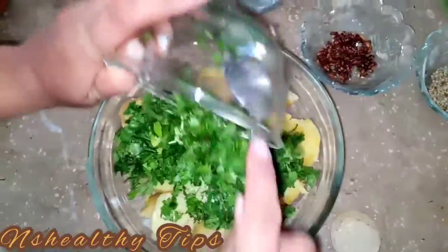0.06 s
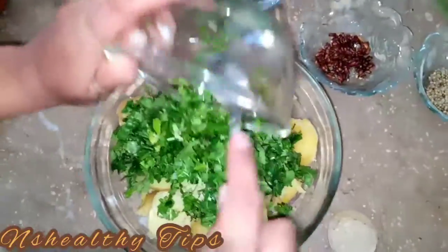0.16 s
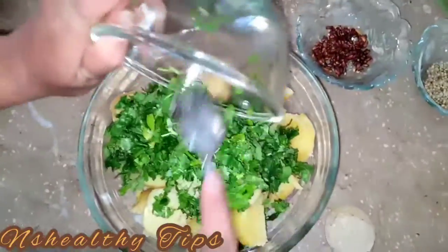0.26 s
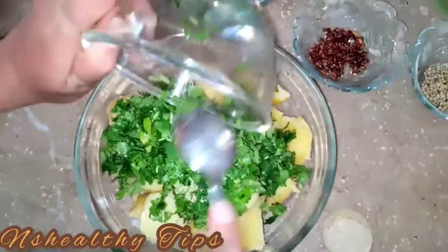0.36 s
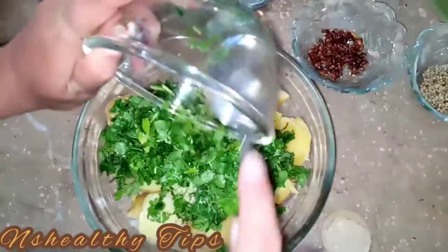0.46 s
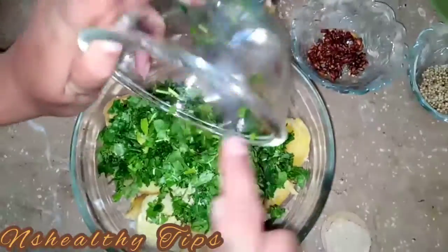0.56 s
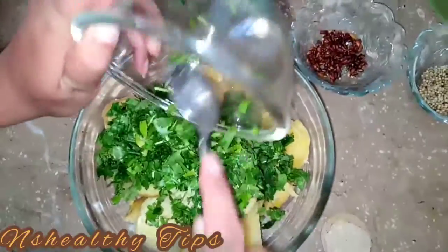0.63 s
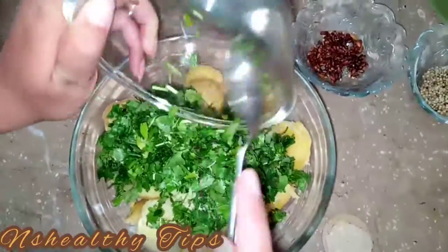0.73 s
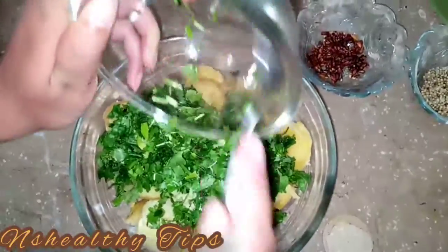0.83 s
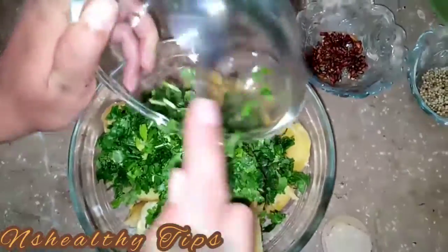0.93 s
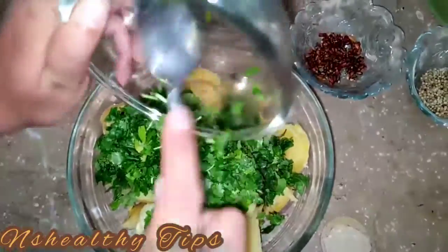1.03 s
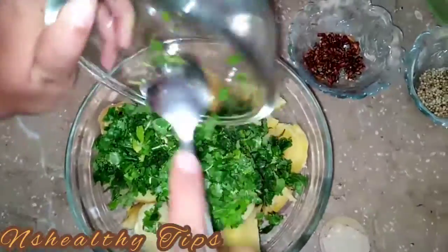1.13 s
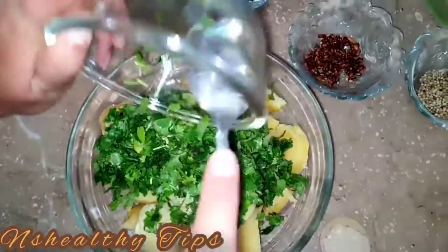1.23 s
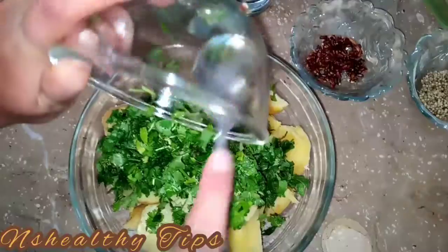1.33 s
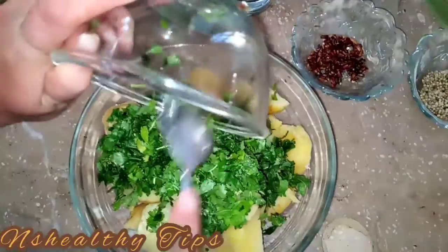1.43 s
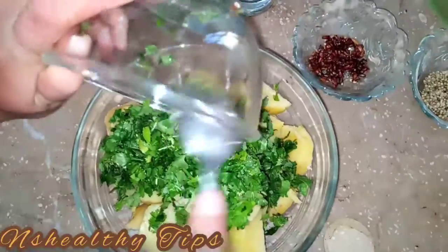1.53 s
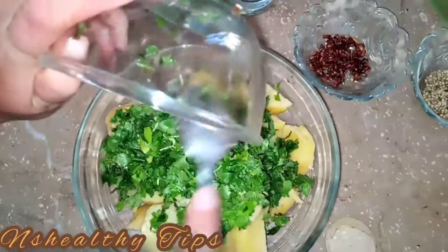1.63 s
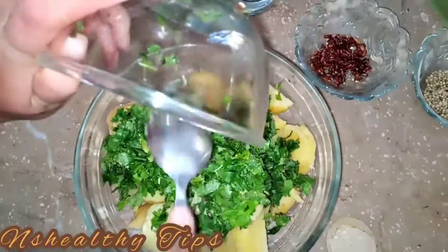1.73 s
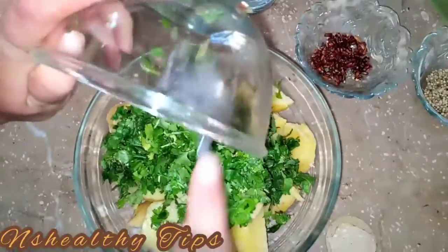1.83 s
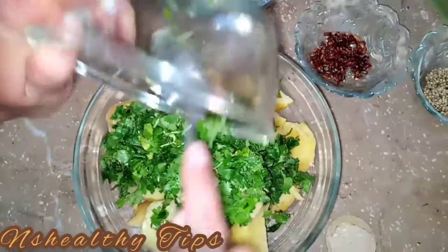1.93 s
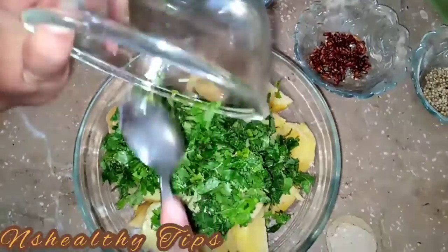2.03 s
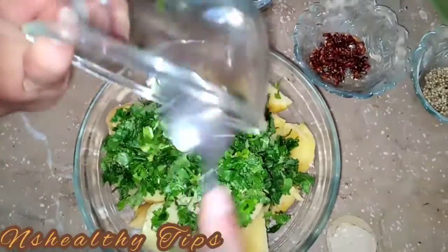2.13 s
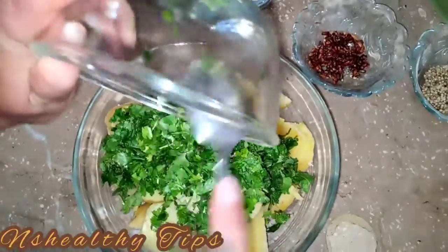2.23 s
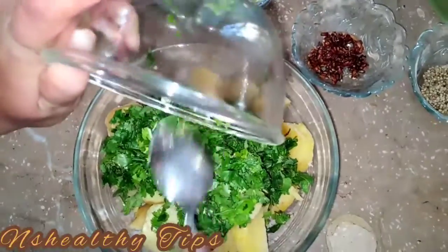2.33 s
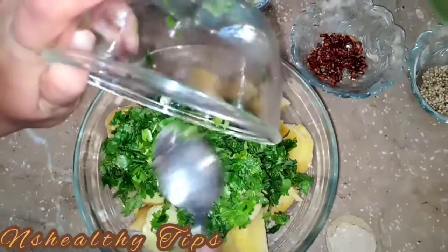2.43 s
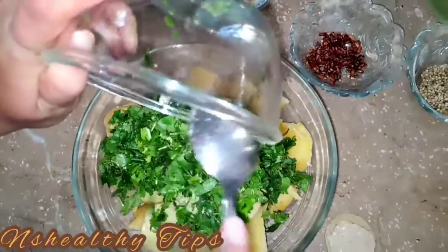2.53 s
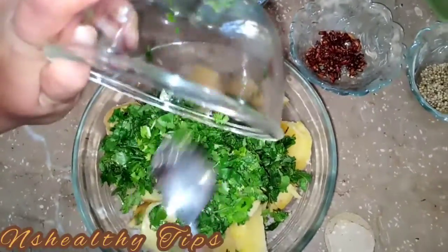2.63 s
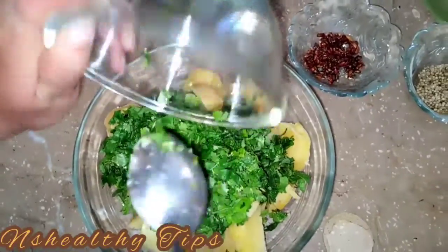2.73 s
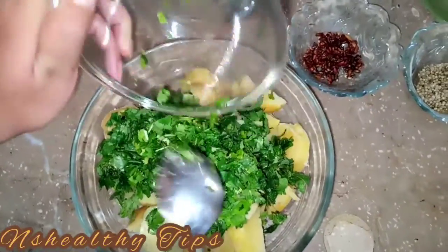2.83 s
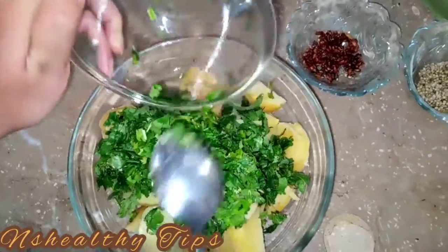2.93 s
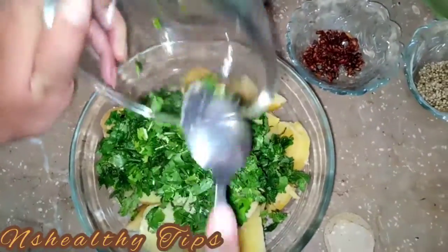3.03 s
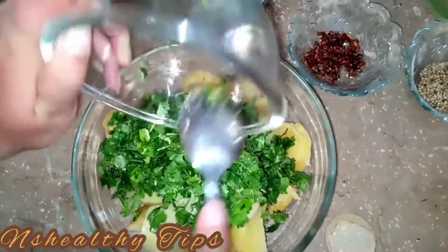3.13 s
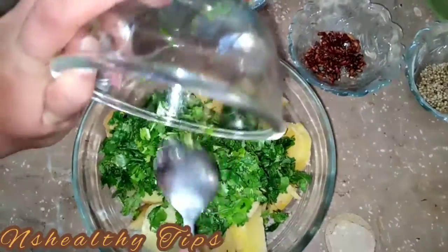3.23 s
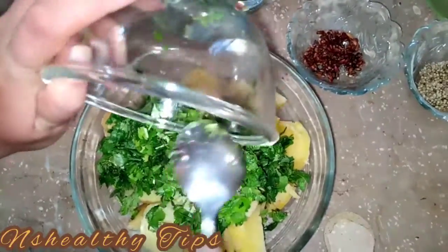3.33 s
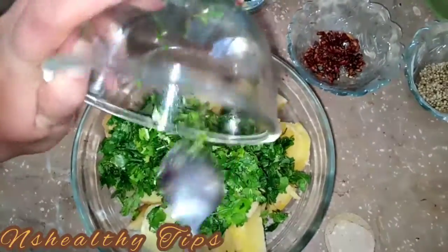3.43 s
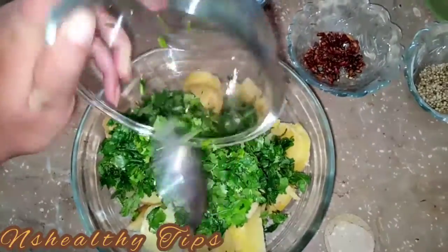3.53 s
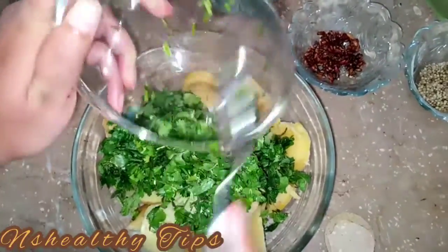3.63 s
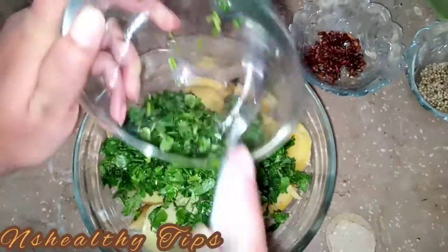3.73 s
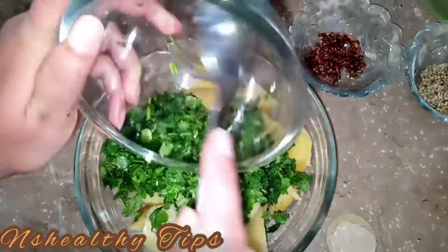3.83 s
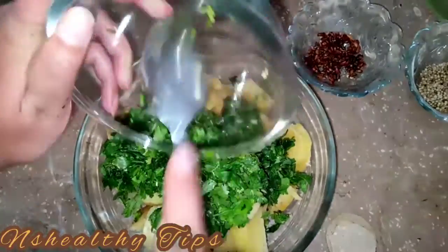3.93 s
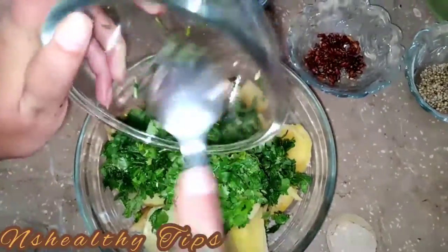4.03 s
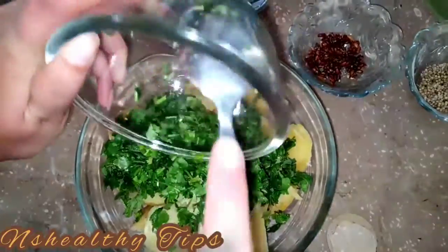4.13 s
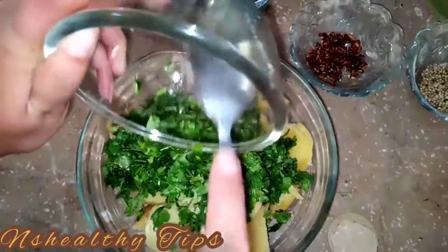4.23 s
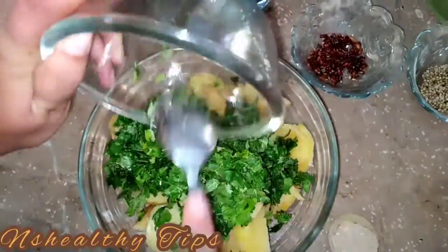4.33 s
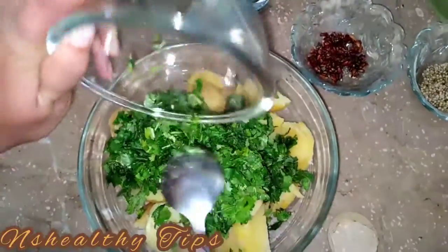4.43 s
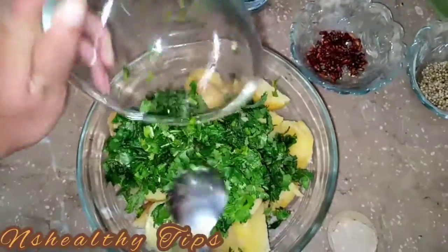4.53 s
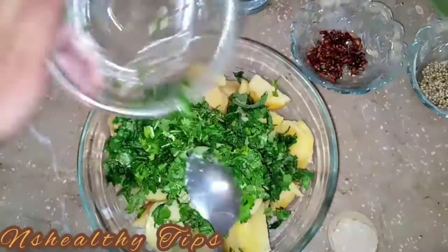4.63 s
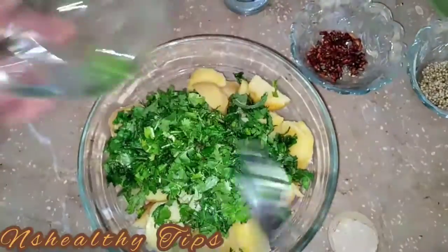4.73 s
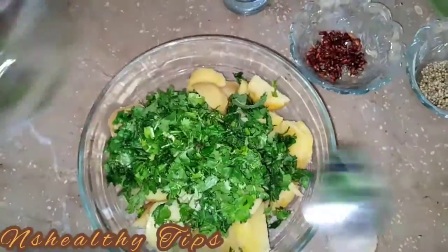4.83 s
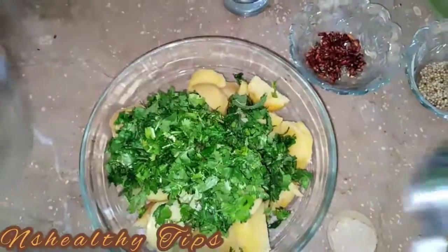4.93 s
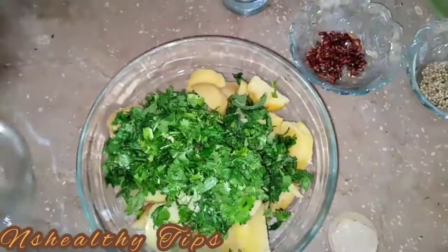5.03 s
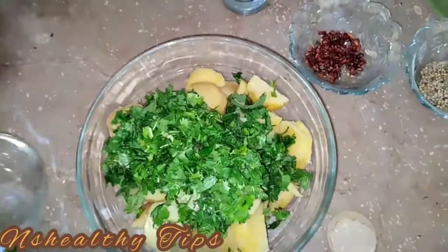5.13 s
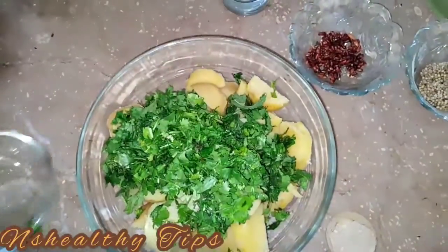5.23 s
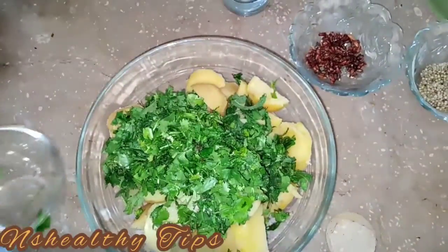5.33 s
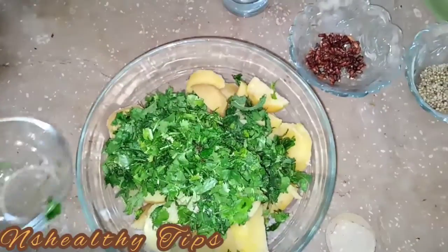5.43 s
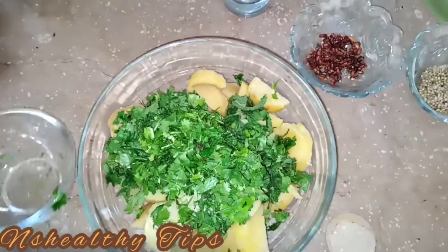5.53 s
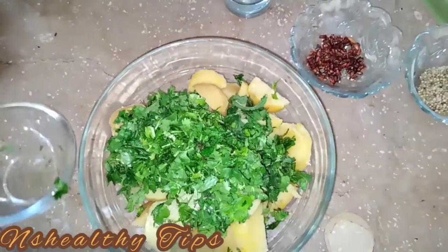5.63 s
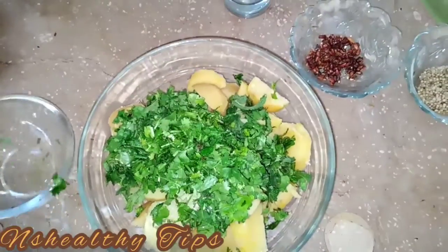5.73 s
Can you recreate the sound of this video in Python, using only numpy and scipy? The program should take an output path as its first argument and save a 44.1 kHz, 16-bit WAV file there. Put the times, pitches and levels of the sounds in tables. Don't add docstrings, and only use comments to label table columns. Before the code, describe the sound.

A close, nearly mono kitchen sound with a steady airy hiss, very faint far traffic and a short, bright room tail. A steel spoon strikes a hand-held glass bowl: a crisp clink at 0.05 s, two more near 0.45 s, a tap with a scrape at 0.75 s, and the strongest clear tap at 1.2 s. A short squeak follows at 1.37 s, a raspy tap at 1.55 s and a duller edge knock at 1.86 s. Chattering clusters come at 2.2-2.6 s and 3.1-3.4 s, with gritty rasps between glassy rings, all choked quickly by the grip. From 3.9 to 4.3 s, edge knocks ring the spoon's handle thinly, the last brightest, trailing into a faint scrape. Hiss alone follows, with a barely audible hand brush at 5.2 s. At 5.6 s the bowl's foot clacks hard on stone, rocks back at 5.67 s and settles over a low, soft counter boom.

```python
import sys
import numpy as np
from scipy import signal
from scipy.fft import rfft, irfft, next_fast_len
from scipy.io import wavfile
from scipy.ndimage import uniform_filter1d, minimum_filter1d, map_coordinates

SR = 44100
rng = np.random.default_rng(int(sys.argv[2]) if len(sys.argv) > 2 else 0)


def unload_wav(signal):
    wavfile.write(
        sys.argv[1],
        SR,
        np.round(np.clip(np.atleast_2d(signal).T, -1, 1) * 32767).astype(np.int16),
    )


def decibels_to_gain(level_db):
    exponent = np.asarray(level_db, float) / 20
    return 10 ** exponent


N = 254671


def unit(x):
    return x / np.sqrt(np.mean(x ** 2) + 1e-20)


def along(points, hz):
    f, v = np.transpose(points)
    return np.interp(np.log(hz + 1), np.log(f + 1), v)


def coloured(x, spectrum):
    m = next_fast_len(len(x) + 8192)
    hz = np.fft.rfftfreq(m, 1 / SR)
    response = decibels_to_gain(along([(1, -120)] + spectrum + [(SR / 2, -120)], hz))
    return irfft(rfft(x, m) * response, m)[:len(x)]


def add(track, s, sound):
    track[round(s * SR):][:len(sound)] += sound


def wobble(rate):
    return map_coordinates(rng.standard_normal(int(N * rate / SR) + 4), [np.arange(N) * rate / SR])


def curve(rows):
    return np.interp(np.arange(N) / SR, *np.transpose(rows))


LIFE = np.arange(SR // 5) / SR


def ring(modes, db, scatter_db=0.0, beat_depth=0.19, damping=1):
    hz, level, t60 = np.transpose(modes)[..., None]
    luck = rng.standard_normal((4, len(modes), 1))
    attack = 1 - np.exp(-LIFE / 0.00041)
    decay = decibels_to_gain(db + level + scatter_db * luck[0] - 60 * LIFE / np.abs(t60 * damping)) * attack
    choke = .5 + 0.27 * np.exp(-(LIFE / 0.019) ** 2)
    beat = 1 + beat_depth * np.cos(2 * np.pi * 0.015 * hz * luck[2] * LIFE + 3 * luck[3])
    flutter_depth = 1.2 * beat_depth * np.clip(hz / 4000, 0, 1) * (1 - np.exp(-LIFE / .008))
    flutter = 1 + flutter_depth * np.cos(2 * np.pi * 85 * (1 + .3 * luck[0]) * LIFE + 3 * luck[1])
    tone = np.sign(luck[2]) * np.sin(2 * np.pi * hz * (1 + 0.0045 * luck[1]) * LIFE)
    return np.sum(decay * choke * beat * flutter * tone, axis=0)


def burst(spectrum, db, t60):
    noise = unit(coloured(rng.standard_normal(len(LIFE)), spectrum))
    return noise * decibels_to_gain(db - 60 * LIFE / t60) * (1 - np.exp(-LIFE / 0.00045))


def patchy(spectrum, size, patchy_db, streak_db):
    z = signal.stft(rng.standard_normal(N), nperseg=size)[2]
    patches = uniform_filter1d(rng.standard_normal(z.shape), size=12, axis=0)
    patches = uniform_filter1d(patches, size=5, axis=1)
    streaks = uniform_filter1d(rng.standard_normal(z.shape), size=3, axis=1)
    gain = decibels_to_gain(patchy_db * unit(patches) + streak_db * np.clip(unit(streaks), -3, 1.5))
    return unit(coloured(signal.istft(z * gain, nperseg=size)[1][:N], spectrum))


# t/s, level/dB
TRAFFIC_LEVEL = [(0.0, -77), (0.29, -89), (0.5, -76), (1.13, -86.5), (1.33, -77), (1.41, -85), (2.0, -78),
                 (2.13, -85.5), (2.84, -78.5), (3.01, -77.5), (3.19, -79), (3.51, -89), (3.95, -81.5),
                 (4.94, -84), (5.36, -77), (5.58, -71)]
AIR_LEVEL = [(0.0, -48), (0.08, -48.5), (1.29, -48), (1.44, -47.5), (2.28, -48.5), (2.41, -47.5),
             (2.89, -50), (3.31, -48), (3.47, -48.5), (4.74, -50), (5.66, -46.5), (5.77, -47)]
# f/Hz, level/dB per Hz
RUMBLE_SPECTRUM = [(25, -39), (60, -2.5), (120, 7), (190, -0.5), (260, -35)]
DRONE_SPECTRUM = [(140, -14.5), (220, -4), (330, 0.5), (450, -6), (600, -2), (780, -4), (950, -36)]
MURK_SPECTRUM = [(700, -20), (850, 3), (1300, 7.5), (2500, 3.5), (4000, 6.5), (5000, 11.5)]
HISS_SPECTRUM = [(4000, -19), (5500, -2.5), (6700, -2), (7600, -9), (13800, -22), (14600, -8),
                 (15600, -1.5), (15800, -40)]


def floor():
    traffic_db, air_db = curve(TRAFFIC_LEVEL), curve(AIR_LEVEL)
    rumble = decibels_to_gain(traffic_db + 0.5) * patchy(RUMBLE_SPECTRUM, size=1024, patchy_db=2.5, streak_db=3.5)
    drone_db = -69 + 0.49 * (traffic_db - traffic_db.mean()) + 0.92 * wobble(4.0)
    drone = decibels_to_gain(drone_db) * patchy(DRONE_SPECTRUM, size=2048, patchy_db=2.0, streak_db=8.0)
    murk_db = -51.5 + 0.63 * (air_db - air_db.mean()) + 0.5 * wobble(4.6)
    murk = decibels_to_gain(murk_db) * patchy(MURK_SPECTRUM, size=2048, patchy_db=2.0, streak_db=4.5)
    hiss = decibels_to_gain(air_db + 1.0) * patchy(HISS_SPECTRUM, size=2048, patchy_db=2.0, streak_db=4.5)
    return rumble + drone + murk + hiss


# f/Hz, t60/s
KITCHEN_T60 = [(300, .25), (1200, .21), (3000, .19), (8000, .14), (16000, .08)]


def kitchen(x):
    out = np.zeros(N + SR)
    for start in range(0, N, SR // 2):
        hz, t, z = signal.stft(rng.standard_normal(SR // 3), SR, nperseg=256)
        decay = decibels_to_gain(-60 * t / along(KITCHEN_T60, hz)[:, None])
        tail = signal.istft(z * decay, SR, nperseg=256)[1]
        echo = signal.fftconvolve(x[start:start + SR // 2], tail / np.linalg.norm(tail))
        add(out, start / SR + .004, echo)
    return out[:N]


# f/Hz, level/dB, t60/s
BOWL_MODES = [
    [(1174.6, -2, 0.31), (1215, 1.5, 0.1), (1140, -21, 0.016)],
    [(2893, -8.5, 0.17), (2964, 2.5, 0.035), (2986, -11, 0.1), (3320, -50, 0.035)],
    [(5280, -3.5, 0.079), (5283, 2.5, 0.067), (5515, -7.5, 0.069), (4900, -25, 0.038), (5330, -24, 0.05),
     (5750, 0, 0.017)],
]
# t/s, clack level/dB, boom level/dB
LANDINGS = [
    (5.609, -19.5, -49),
    (5.631, -53, -49),
    (5.671, -26, -53),
    (5.692, -39, -49.5),
    (5.703, -39, -48.5),
    (5.226, -50, -56.5),
    (5.205, -50, -63),
]
# f/Hz, level/dB, t60/s
COUNTER_MODES = [(96.7, -3, 0.94), (310, 8, 0.032), (544, 0, 0.043)]
# f/Hz, level/dB per Hz
CLACK_SPECTRUM = [(88, -48), (150, -14.5), (638, -12), (1170, 5), (2240, 1), (3510, -6), (5600, -28),
                  (9100, -58)]
# f/Hz, level/dB
FOOT_SPECTRUM = [(1500, -17), (2500, -4), (4300, 2), (5200, -26)]


def landing():
    out = np.zeros(N + SR)
    for s, clack_db, boom_db in LANDINGS:
        clack = burst(CLACK_SPECTRUM, clack_db + 0.5, 0.053)
        hum = burst([(750, -12.5), (900, 1), (1250, -11), (1500, -7.0)], clack_db - 17.0, 0.35)
        boom = ring(COUNTER_MODES[1:], boom_db + 3.0, scatter_db=4.0, beat_depth=0)
        grit = burst(FOOT_SPECTRUM, clack_db - 14, 0.027)
        add(out, s, clack + hum + grit + ring(BOWL_MODES[0], clack_db - 10.5) + boom)
    slab = COUNTER_MODES[:1]
    add(out, LANDINGS[0][0], ring(slab, -46, scatter_db=1, beat_depth=0, damping=0.19))
    add(out, LANDINGS[2][0], ring(slab, -41, beat_depth=0))
    return out[:N]


# t/s, f/Hz, level/dB, t60/s
SPOT_RINGS = [(0.0566, 5306, -15.5, .045), (0.074, 5320, -27.5, 0.088), (.0745, 3800, -25, .015),
              (0.5213, 3410, -25, 0.014), (.5218, 8130, -23, .02), (.5218, 8490, -28, .03),
              (.7445, 2280, -21, .012), (.7445, 3900, -26, 0.011), (.768, 5350, -27, 0.053),
              (1.2148, 6630, -25, .02), (1.2145, 4180, -25, 0.014), (1.223, 5290, -20, .05),
              (1.243, 2930, -28.5, 0.044), (1.383, 2920, -35, .05), (1.3085, 2950, -35, .03),
              (1.8562, 3780, -19, .014), (1.8563, 1650, -30, .016), (1.858, 952, -28, .022),
              (1.862, 952, -43, .25), (1.859, 7900, -30, .015), (1.858, 5700, -30, .02),
              (2.494, 2870, -15, 0.016), (2.4958, 5250, -12, .01), (2.505, 2840, -27, .04),
              (2.546, 5400, -25, .04), (2.571, 2100, -24, 0.018), (2.571, 3900, -27, 0.018),
              (3.125, 3920, -15, 0.013), (3.131, 3910, -21, .035), (3.1445, 5500, -20, .015),
              (3.150, 5570, -18, .02), (3.186, 2050, -27.5, .025), (3.9368, 3590, -28, .04),
              (3.9378, 2356, -31, 0.076), (3.9348, 2114, -31, .04), (3.941, 1060, -32, .04),
              (3.940, 3070, -28.5, 0.027), (3.901, 8380, -39, .03), (4.0875, 5310, -10.5, .014),
              (.7475, 5350, -15, .016), (1.592, 1180, -38, .2), (1.5485, 5450, -15, .035),
              (4.1325, 3980, -32, 0.017), (4.1325, 7210, -33, .03), (4.1335, 8260, -30, .015),
              (4.134, 980, -30.5, .04), (4.1325, 12800, -34, .03)]
# t/s, f/Hz, level/dB, t60/s
STONE_RINGS = [(5.6093, 1174, -32, .2), (5.6095, 2170, -26, .05), (5.6127, 2100, -26, .03),
               (5.6105, 2466, -32, .05), (5.6122, 1300, -13, .005), (5.6095, 550, -39, 0.071),
               (5.6093, 305, -46, 0.11), (5.6725, 1850, -30, .04), (5.6725, 1170, -30, .03),
               (5.692, 900, -38, 0.11), (5.6095, 3400, -30, .03), (5.6095, 900, -30, .025),
               (5.634, 1250, -30, .02), (5.694, 1900, -34, .03)]


def spots():
    out = np.zeros(N + SR)
    for s, hz, db, t60 in SPOT_RINGS + STONE_RINGS:
        add(out, s, ring([(hz, db, t60)], 2.5, beat_depth=.45))
    return out[:N]


# start t/s, length/s, f/Hz, rise as a share of f, level/dB
SQUEAK_EVENTS = [(0.739, 0.01, 5340, 0.085, -32), (1.02, 0.051, 1161, 0.028, -45.5),
                 (1.367, 0.019, 2600, 0.12, -22), (1.546, 0.006, 5470, 0.011, -26),
                 (1.921, 0.039, 2296, 0.124, -40.5), (1.93, 0.039, 2930, 0.07, -47.5),
                 (2.005, 0.012, 2960, .01, -47.5), (2.322, 0.011, 2840, .01, -46),
                 (2.532, 0.024, 3060, 0.046, -24.5), (4.281, 0.073, 3123, 0.01, -46),
                 (4.356, 0.033, 2070, 0.0054, -44), (5.559, 0.019, 1290, .01, -47)]
# start t/s, length/s, level/dB
RASP_EVENTS = [(0.738, 0.0089, -25), (0.864, 0.0078, -28), (1.016, 0.034, -38), (1.375, 0.027, -43),
               (1.546, 0.01, -20.5), (1.843, 0.012, -40), (1.917, 0.046, -42), (2.509, 0.03, -31.5),
               (2.536, 0.023, -19.5), (3.127, 0.028, -32), (3.167, 0.052, -31), (3.393, 0.11, -32.5),
               (3.875, 0.065, -34.5), (4.291, 0.15, -39), (4.355, 0.05, -38), (5.54, 0.0093, -56)]


def skids():
    out = np.zeros(N + SR)
    for s, length, hz, glide, db in SQUEAK_EVENTS:
        gone = np.clip(LIFE / length, 0, 1)
        jitter = 0.052 * rng.standard_normal(len(LIFE))
        phase = np.cumsum(2 * np.pi * hz * (1 + glide * gone) / SR + jitter)
        add(out, s, decibels_to_gain(db) * np.sin(np.pi * gone) ** 2 * (np.sin(phase) + 0.34 * np.sin(2 * phase)))
    for s, length, db in RASP_EVENTS:
        swell = np.sin(np.pi * np.clip(LIFE / length, 0, 1)) ** 2
        sharp_grains = swell * rng.standard_normal(len(LIFE)) ** 3 / 4
        grit = sharp_grains + swell * rng.standard_normal(len(LIFE))
        glass = ring([(5340, 2.5, 0.0075), (5900, -26, 0.027), (8270, -11.0, 0.012), (1630, -16.5, 0.031),
                      (2206, -3.5, 0.0083), (3370, -3, 0.0062), (4130, -34, 0.0047)], 0)
        rasp = signal.fftconvolve(grit, glass)[:len(LIFE)]
        add(out, s, decibels_to_gain(db) * (rasp / np.abs(rasp).max() + 0.0064 * np.diff(grit, prepend=0)))
    return out[:N]


# t/s, middle, low and top ring level/dB, top ring f/Hz
CHATTER_EVENTS = [(0.288, -33.5, -55, -26.5, 5550), (0.5184, -31, -64, -38, 5670),
                  (0.7447, -38, -35, -12, 5540), (1.5458, -56, -53, -11, 5435),
                  (1.8562, -32, -55, -32, 5750), (2.169, -25, -48, -19, 5340),
                  (2.2747, -25.5, -51, -19, 5490), (2.3095, -32, -37, -25, 5650),
                  (2.4933, -22.5, -29, -28, 5930), (2.5411, -24, -41, -28, 5600),
                  (2.5515, -37, -48, -21, 5480), (2.5708, -20, -22, -13, 5800),
                  (3.1236, -20, -60, -26, 5370), (3.134, -22, -49, -14.5, 5440),
                  (3.1476, -41, -51, -24, 5700), (3.1847, -28, -32, -23, 5450),
                  (3.2176, -29, -52, -30, 5430), (3.227, -30.5, -48, -27.5, 5600),
                  (3.3848, -16, -42, -9.5, 5765), (3.3926, -18.5, -49, -15, 5700),
                  (3.399, -46, -51, -38, 5340), (3.41, -29, -25, -22, 5640), (3.938, -21, -36, -44, 5500),
                  (4.2736, -15.5, -46, -45, 6250)]
# f/Hz, level/dB, share of t60
BELLY_MODES = [(3820, -11, 0.39), (3800, 0.5, 0.28), (4060, -12, 0.34)]
# f/Hz, level/dB
GRAIN_SPECTRUM = [(1500, -14), (2100, -2.5), (3700, 1.5), (4600, -3.5), (5700, -32), (6800, -33),
                  (9000, -16)]


def chatter():
    choke_t60 = 0.038
    out = np.zeros(N + SR)
    for s, mid_db, low_db, top_db, top_hz in CHATTER_EVENTS:
        modes = [(hz, mid_db + db - 0.5, choke_t60 * share) for hz, db, share in BELLY_MODES]
        modes += [(2030, low_db - 4.0, 0.73 * choke_t60), (top_hz, top_db, 0.73 * choke_t60)]
        add(out, s, ring(modes, 0) + burst(GRAIN_SPECTRUM, mid_db - 7.5, choke_t60))
    return out[:N]


# t/s, crack, thud, bowl's low and middle family level/dB
EDGE_KNOCKS = [
    (0.0735, -26, -38.5, -51, -34),
    (0.5187, -31.5, -38, -53, -52),
    (0.8688, -36, -47, -38, -60),
    (1.8568, -33, -42, -41, -58),
    (3.9345, -38, -37, -39, -31),
    (4.132, -33, -40, -45, -40),
    (4.2742, -33, -43.5, -33, -21),
]
# t/s, freedom from the fingers, level/dB of its three modes
HANDLE_RINGS = [
    (.0735, 1.16, -20, -45, -26),
    (.5215, 0.32, -18.5, -33, -20),
    (.869, .8, -50, -38.5, -26),
    (1.857, 0.86, -31, -30, -18.5),
    (3.9, .5, -44, -55, -55),
    (3.935, 0.79, -32, -32, -52),
    (4.133, 0.97, -40, -36.5, -50),
    (4.274, 1.8, -15, -36, -34),
]
# f/Hz, t60/s
HANDLE_MODES = [(7950, 0.048), (11520, 0.091), (13600, 0.035)]
# f/Hz, level/dB, t60/s
THUD_MODES = [(976, 13, 0.021), (1562, 3.5, 0.041)]
# f/Hz, level/dB
DULL_SPECTRUM = [(400, -12.5), (900, 8), (2300, -6.5), (3600, 3), (5000, -66)]
# f/Hz, level/dB
TICK_SPECTRUM = [(600, -85), (2000, 0), (5500, 13), (9000, 13.5), (12000, -6.5), (15500, 11), (17000, -58)]
CRACK_SPECTRUM = [(300, -57), (700, -30), (1200, 2), (4000, 3.5), (8000, -7), (13000, -11), (15500, 5.5),
                  (17000, -67)]


def edges():
    out = np.zeros(N + SR)
    for s, crack_db, thud_db, low_db, mid_db in EDGE_KNOCKS:
        family_db = (low_db, mid_db, crack_db - 5)
        glass = sum(ring(m, db - 2.0, beat_depth=.5, damping=.6) for m, db in zip(BOWL_MODES, family_db))
        thud = ring(THUD_MODES, thud_db - 2) + burst(DULL_SPECTRUM, thud_db + 1.5, 0.061)
        contact = burst(TICK_SPECTRUM, crack_db + 8.5, 0.016) + burst(CRACK_SPECTRUM, crack_db, 0.022)
        add(out, s, contact + thud + glass)
    for s, freedom, *mode_db in HANDLE_RINGS:
        modes = [(hz, db, t60) for (hz, t60), db in zip(HANDLE_MODES, mode_db)]
        add(out, s, ring(modes, 0, scatter_db=-2.5, beat_depth=0.087, damping=freedom))
    return out[:N]


# t/s, strength level/dB, low and middle family over it level/dB, freedom from the grip
TAP_EVENTS = [(0.054, -18, -19, -4.5, 0.91), (0.436, -15.5, -15, -10, 0.85),
              (0.4721, -20.5, -31, -16, 0.41), (0.7436, -17.5, -4, -7, 0.27),
              (1.2147, -13, -15.5, -10, 0.56), (1.548, -18, -20, -5, 0.76), (2.17, -16, -12.5, -1, 0.5),
              (2.494, -20.5, -3, -2, 0.26), (2.5686, -20, -17.5, -7, 0.31),
              (3.1251, -17.5, -8.5, 2.5, 0.61), (3.3843, -19, -13.5, -8, 1), (4.0867, -24, -4, -1, 0.48)]
# t/s, strength level/dB, low and middle family over it level/dB
REBOUND_EVENTS = [
    (0.764, -26.5, -24, -33),
    (1.2215, -28.5, -11, -6),
    (1.3093, -46, -3, -6),
    (3.1513, -30.5, -10, -28),
    (3.4202, -30.5, -14, 1),
    (3.7424, -38, -16, -23),
]
# t/s, rim mode level/dB, further mode f/Hz, its level/dB
RIM_RINGS = [(.0545, -26, 14600, -45), (.437, -33, 14680, -44), (0.7525, -30.5, 14500, -23),
             (1.214, -24, 13600, -22), (1.545, -26, 14040, -24), (2.17, -26, 14600, -45),
             (2.495, -39, 11720, -35), (3.126, -24, 11900, -37), (3.385, -33, 7200, -27),
             (3.937, -50, 5230, -34), (4.087, -25, 14800, -23)]


def taps():
    out = np.zeros(N + SR)
    # -7.5 dB in a tap, -31 dB in a rebound
    blows = [(*row, -7.5) for row in TAP_EVENTS] + [(*row, .6, -31) for row in REBOUND_EVENTS]
    for s, db, low_db, mid_db, freedom, crack_db in blows:
        glass = sum(ring(m, db + over + 1.0, beat_depth=.5, damping=freedom)
                    for m, over in zip(BOWL_MODES, (low_db, mid_db, 0)))
        tick = burst(TICK_SPECTRUM, db + crack_db + 3.5, 0.0034)
        add(out, s, tick + burst(CRACK_SPECTRUM, db + crack_db, 0.027) + glass)
    for s, rim_db, top_hz, top_db in RIM_RINGS:
        add(out, s, ring([(8290, rim_db, 0.04), (top_hz, top_db, 0.032)], 0, beat_depth=0.42))
    return out[:N]


# f/Hz, level/dB
HELD_BASS_CUT = [(90, -30), (350, 0), (21000, 0)]


def scene():
    held = coloured(taps() + chatter() + edges() + skids(), HELD_BASS_CUT)
    near = held + landing() + spots()
    return np.tile(near + decibels_to_gain(-9.5) * kitchen(near) + floor(), (2, 1))


# t/s, length/s, side level/dB
SIDE_MOMENTS = [
    (0.024, 0.063, -27),
    (0.427, 0.0097, -10),
    (0.508, 0.014, -1),
    (0.732, 0.033, -7.5),
    (0.86, 0.017, -3),
    (1.536, 0.011, -4),
    (1.849, 0.034, -6),
    (2.143, 0.023, -15),
    (2.493, 0.035, -22),
    (3.123, .008, -24),
]


def split(x):
    side = np.zeros(N)
    treble = [(.4 * 5500, -100), (0.68 * 5500, -30), (5500, 0), (15800, 0), (16500, -30)]
    for s, length, db in SIDE_MOMENTS:
        piece = x[round(s * SR):round((s + length) * SR)]
        piece = piece * signal.windows.tukey(len(piece), .3)
        scrambled = piece * unit(uniform_filter1d(rng.standard_normal(len(piece)), size=40))
        add(side, s, decibels_to_gain(db) * coloured(scrambled, treble))
    return side * [[1], [-1]]


def top_cut(x):
    return signal.sosfilt(signal.butter(12, 16990, fs=SR, output="sos"), x)


# f/Hz, level/dB
MICROPHONE_RESPONSE = [(20, -16), (70, 0), (16000, 0), (17000, 0)]


def record(dry):
    x = coloured(dry[0], MICROPHONE_RESPONSE)
    level = np.sqrt(np.abs(uniform_filter1d(x ** 2, 128)))
    ahead = -minimum_filter1d(-level, 801, origin=-400)
    jump_db = 20 * np.log10((ahead + 1e-6) / (level + 1e-6))
    duck_db = -.2 * np.clip(jump_db - 15.5, 0, 30)
    x = x * decibels_to_gain(uniform_filter1d(duck_db, 64))
    x = x / (1 + (x / .55) ** 4) ** .25
    return top_cut(x + split(x))


dry = scene()
out = record(dry)
unload_wav(out)
```